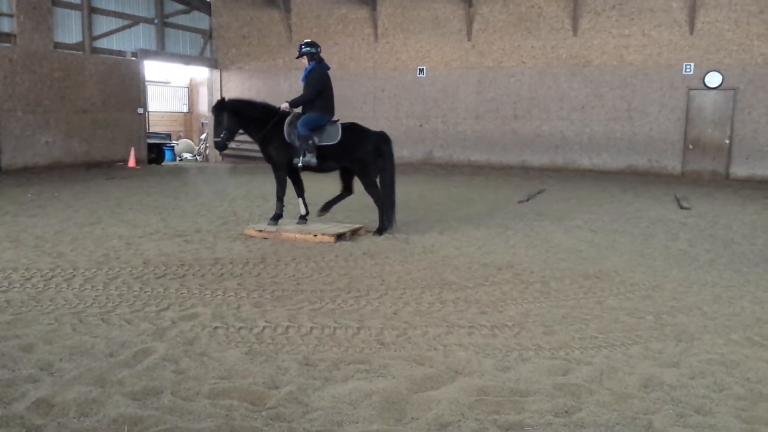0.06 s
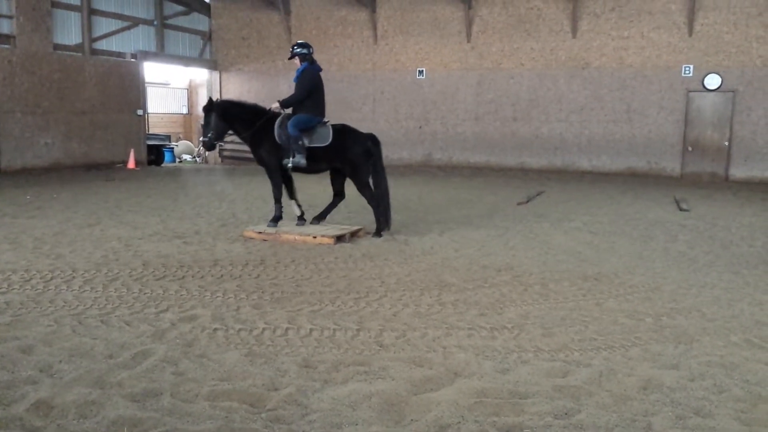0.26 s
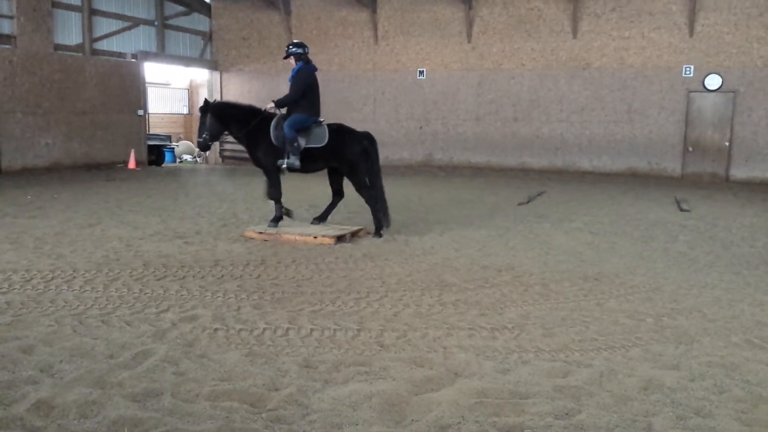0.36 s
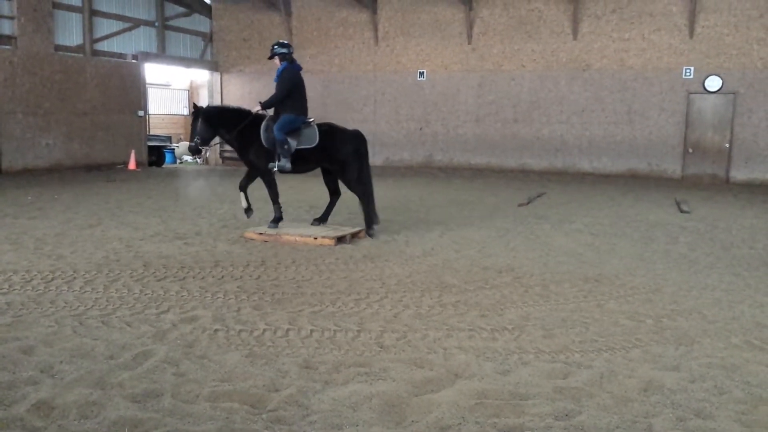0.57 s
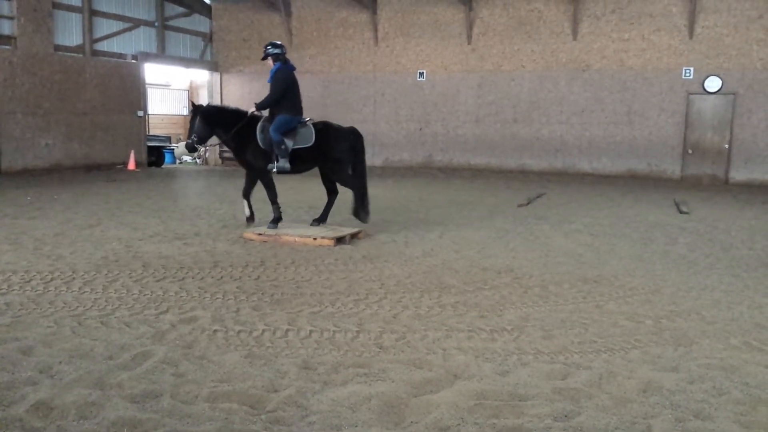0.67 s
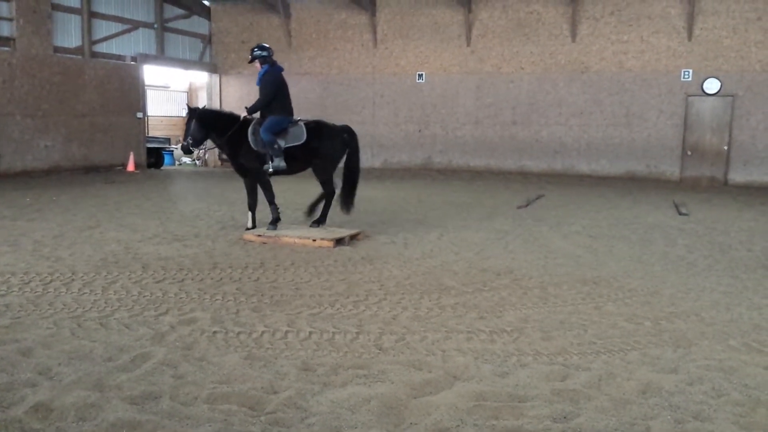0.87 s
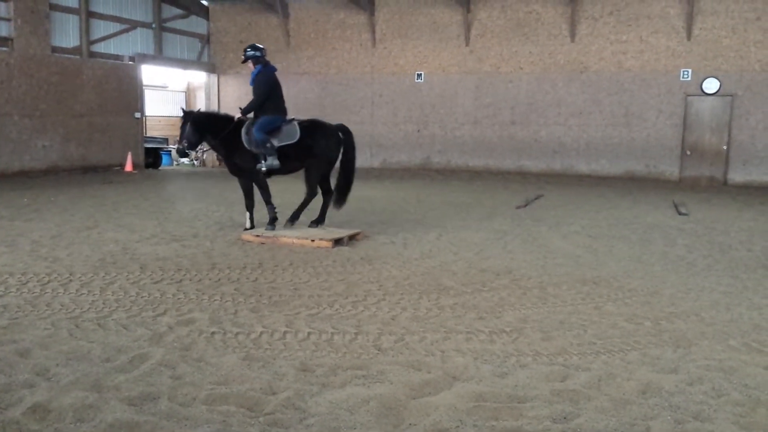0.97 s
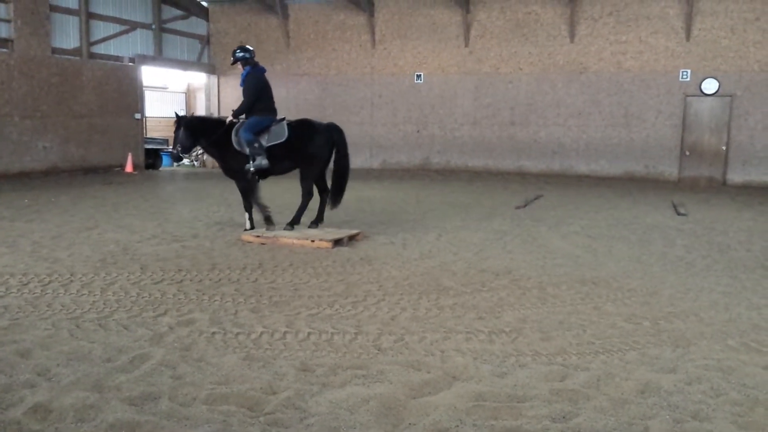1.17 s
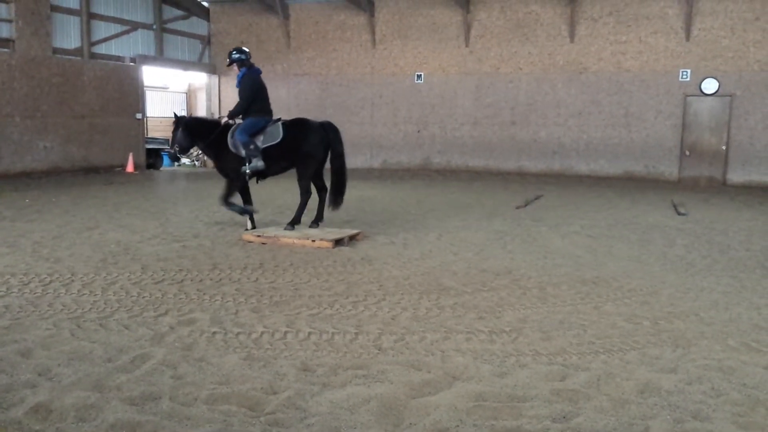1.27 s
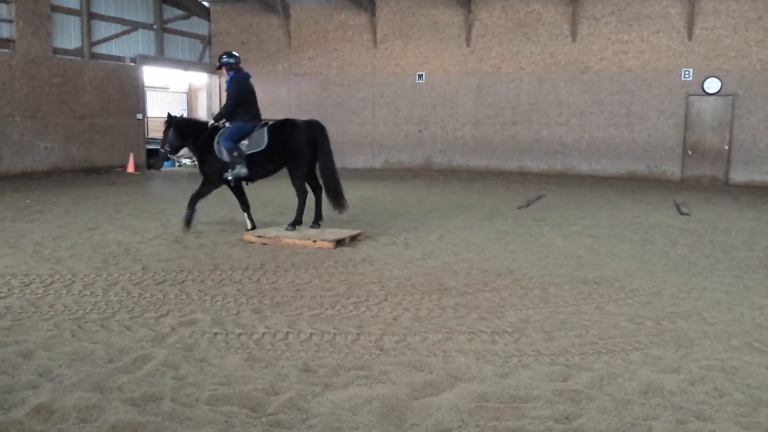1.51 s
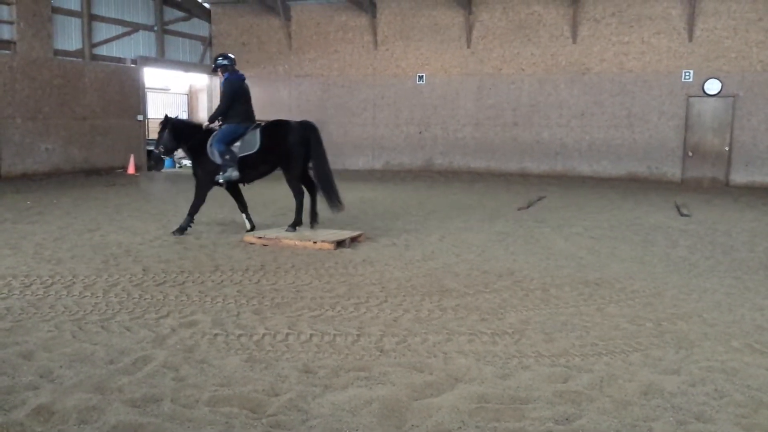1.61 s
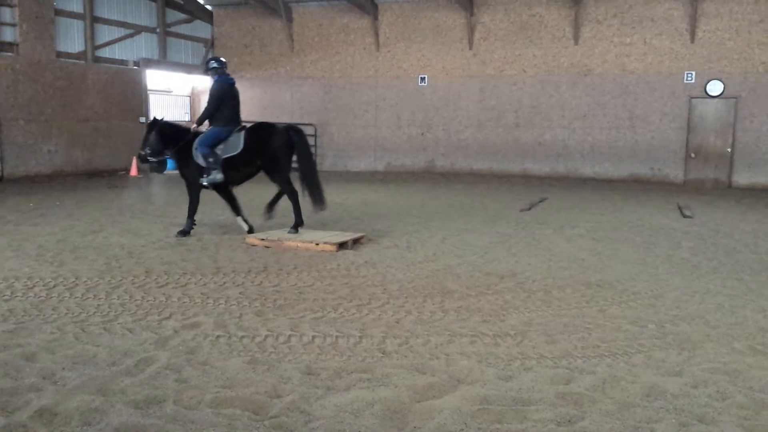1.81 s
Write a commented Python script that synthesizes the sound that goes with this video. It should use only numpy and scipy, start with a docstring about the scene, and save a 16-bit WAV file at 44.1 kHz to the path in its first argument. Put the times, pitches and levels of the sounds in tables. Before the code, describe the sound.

A horse's hooves knock and boom on hollow boards in an indoor riding arena.

```python
"""An indoor riding arena, where a horse walks over a low, hollow wooden platform.
Each hoof lands in a quick roll of impacts that excite the modes of the boards, and the deck booms
in its low modes as the hooves land and the weight shifts. Between the thuds the hooves scuff through
sand, and grit and tack tick. The big hall reverberates over a faint, steady rumble."""
import sys
import numpy as np
from scipy import signal
from scipy.fft import rfft, irfft, next_fast_len
from scipy.io import wavfile

SR = 44100
rng = np.random.default_rng(int(sys.argv[2]) if len(sys.argv) > 2 else 0)


def to_wav(s):
    """Save 16-bit WAV."""
    ch = np.atleast_2d(s).T  # columns
    pcm = np.round(np.clip(ch, -1, 1) * 32767)  # PCM
    wavfile.write(sys.argv[1], SR, pcm.astype(np.int16))


N = 81585
BURST_SAMPLES, TAIL_SAMPLES = SR // 4, SR * 5 // 4

# Modes of the deck: (frequency at pitch ratio 1 [Hz], level [dB], T60 [s], after-ring level [dB])
DECK_MODES = [(117.6, -24, 0.28, -17), (216, -14, 0.097, -10.5), (261.2, -8, 0.058, -9.5),
              (322.7, -7, 0.054, -20), (605, -21.5, 0.038, -17), (666.6, -12.5, 0.039, -69),
              (788.6, -2, 0.041, -13.5), (828.7, -4.5, 0.031, -1), (940, -15, 0.14, -5),
              (1070, -4, 0.054, -41), (1154, -5.5, 0.05, -20), (1543, -18.5, 0.072, -53),
              (1871, -53, 0.029, -25), (2686, -18, 0.033, -23)]


def hooves(attack_s=0.0011, hoof_t60_s=0.08, crack_t60_s=0.073, crack_db=0.5):
    """Impact excitation: each contact rings deck and hoof and cracks; a toe is bright, a sole dull."""
    # Hoof on board: (time [s], level [dB], pitch ratio of the loaded deck, low edge [Hz],
    # high edge [Hz], hoof resonance [Hz], hoof level [dB], send to the hall [dB])
    contacts = [(.2362, -10.5, 0.9, 543, 1380, 832, 1.5, -2.5), (0.2418, -10, 1, 188, 315, 263, -17, -0.5),
                (0.2481, -13, 1, 520, 1650, 1084, -8, -2),
                (0.2561, -8.5, 0.98, 171, 1260, 265.4, -12.5, -3.5),
                (.2745, -19.5, 0.99, 1000, 2970, 2308, -16, -2.5),
                (1.1351, -19.5, .83, 134, 1090, 643, -26, -1),
                (1.1465, -19.5, 0.72, 296, 1350, 1317, -5, -3),
                (1.158, -18.5, 0.95, 128, 417, 385.6, -8, 1),
                (1.322, -42, 0.76, 1450, 2720, 1752, -2.5, 3.5),
                (1.437, -36, .83, 278.6, 812.2, 461, -3, -4.5),
                (1.715, -32.5, 0.96, 278, 800, 640, -4.5, 1), (1.725, -32, 0.72, 555, 1374, 1035, 2, -11),
                (1.739, -31, 0.74, 910, 2110, 1134, -4.5, -7.5)]
    # Spectrum of the impact noise: (frequency at pitch ratio 1 [Hz], relative density [dB])
    crack_spectrum = [(50, -26), (110, 8.5), (190, 2.5), (260, 9), (340, -18.5), (430, -39), (620, -6),
                      (820, 9.5), (1150, -6.5), (1500, 0), (2500, -8.5), (3800, -14.5), (8000, 1.5),
                      (14000, -37)]
    knocks, reverberation = np.zeros((2, N)), np.zeros((2, N))
    t = np.arange(BURST_SAMPLES) / SR
    for s, db, pitch, low_hz, high_hz, hoof_hz, hoof_db, hall_db in contacts:
        boards = sum(damped_mode(t, hz * pitch, level, t60) for hz, level, t60, _ in DECK_MODES)
        hoof = damped_mode(t, hoof_hz, hoof_db, hoof_t60_s)
        noise = coloured(diffuse(BURST_SAMPLES), [(hz * pitch, level) for hz, level in crack_spectrum])
        crack = amp(crack_db) * decay(t, crack_t60_s) * noise
        impact = (boards + hoof + crack) * (1 - np.exp(-t / attack_s))
        knock = amp(db) * butterworth(butterworth(impact, low_hz, "high"), high_hz, "low", order=3)
        add(knocks, knock, s)
        add(reverberation, amp(hall_db) * hall(knock), s)
    return knocks + wall_reflections(knocks) + reverberation


def after_ring(rise_s=0.033):
    """Free vibration: the deck's modes hum on faintly after a full landing."""
    # Full landings: (time [s], level [dB], pitch ratio, high edge [Hz])
    landings = [(.243, -18.5, 0.97, 2610), (1.147, -22.5, .873, 480)]
    # Decay of the hum: (frequency at pitch ratio 1 [Hz], T60 [s])
    hum_t60 = [(120, 1.3), (260, 1.28), (800, 0.65), (1200, 1), (2600, 0.43)]
    out, t = np.zeros(N), np.arange(TAIL_SAMPLES) / SR
    for s, db, pitch, high_hz in landings:
        hum = sum(damped_mode(t, hz * pitch, level, along(hum_t60, hz)) for hz, _, _, level in DECK_MODES)
        add(out, amp(db) * (1 - np.exp(-t / rise_s)) * butterworth(hum, high_hz, "low"), s)
    return out


def deck_booms(rise_s=0.016, hall_db=-7):
    """Flexural vibration: the deck booms in its low modes as the hooves land and the weight shifts."""
    # Landing or shifting weight: (time [s], level [dB], frequency [Hz])
    loads = [(0.092, -49, 122), (0.2381, -16.5, 259.3), (.43, -38, 124), (0.774, -37.5, 134.7),
             (.85, -38.5, 126), (1.136, -29, 134.5), (1.234, -29.5, 226), (1.265, -29, 133),
             (1.521, -30, 136.3), (1.718, -45.5, 130)]
    out = np.zeros(N)
    for s, db, hz in loads:
        age = np.maximum(np.arange(N) / SR - s, 0)
        swell = (age / rise_s * np.exp(1 - age / rise_s)) ** 2
        out += amp(db) * swell * np.sin(2 * np.pi * hz * age)
    return out + amp(hall_db) * hall(out[None])


def sand_scuffs(grains_per_s=2400, spread_db=1):
    """Granular friction: dense, random impulses of tiny grains merge into a crunch under each scuff."""
    # Hoof through sand: (time [s], level [dB], rise [s], decay constant [s], upper treble gain [dB])
    scuffs = [(0.233, -39, 0.0075, 0.024, -1), (.272, -37, 0.0028, 0.01, -10), (.58, -56, .06, .06, -3),
              (0.698, -45, 0.01, 0.086, -3), (0.736, -48, .01, 0.039, -10), (0.874, -53, 0.022, 0.018, 2.5),
              (1.095, -51.5, 0.044, 0.026, -1), (1.132, -45.5, 0.024, 0.076, -6),
              (1.189, -66, 0.0053, .03, 5), (1.263, -53, 0.022, .05, 1), (1.3, -43.5, 0.008, .05, -6.5),
              (1.431, -51.5, 0.0081, 0.046, -15), (1.573, -52, 0.017, 0.24, -5),
              (1.667, -50, 0.013, 0.041, 3.5), (1.716, -49, 0.008, 0.065, -10.5)]
    # Spectrum of the grains: (frequency [Hz], relative density [dB])
    sand_spectrum = [(200, 2), (600, 3.5), (1200, 7.5), (2300, -1), (3200, -4.5), (4300, -3.5), (6200, 2.5),
                     (8500, -4.5), (11000, -8.5), (14500, -25)]
    out, t = np.zeros((2, N)), np.arange(2 * BURST_SAMPLES) / SR
    for s, db, rise_s, decay_s, treble_db in scuffs:
        grains = (rng.random((2, t.size)) < grains_per_s / SR) * rng.standard_normal((2, t.size))
        grains *= amp(spread_db * rng.standard_normal(t.size))
        crunch = equalised(coloured(grains, sand_spectrum), [(3500, 0.0043), (7000, treble_db)])
        envelope = np.minimum(t / rise_s, 1) * np.exp(-np.maximum(t - rise_s, 0) / decay_s)
        add(out, amp(db) * envelope * crunch, s)
    return out


def ticks(relative_width=0.14):
    """Narrow-band transients: grit and tack tick and rasp high in the treble."""
    # Noise bursts: (time [s], level [dB], centre frequency [Hz], decay constant [s])
    bursts = [(0.71, -54.5, 3090, 0.042), (.739, -56.5, 6510, 0.0074), (0.744, -53, 3080, 0.014),
              (0.888, -58, 5800, 0.017), (1.191, -57, 8600, .003), (1.203, -48, 6500, 0.0036),
              (1.266, -54, 9340, 0.0064), (1.675, -56, 10030, 0.011), (1.691, -55.5, 6000, 0.058)]
    out, t = np.zeros((2, N)), np.arange(BURST_SAMPLES) / SR
    for s, db, centre_hz, decay_s in bursts:
        noise = diffuse(BURST_SAMPLES)
        band = unit_rms(filtered(noise, lambda hz: np.exp(-((hz / centre_hz - 1) / relative_width) ** 2)))
        add(out, amp(db) * np.exp(-t / decay_s) * band, s)
    return out


def wall_reflections(x, top_hz=700):
    """Specular reflection: each near wall returns one delayed, dull copy."""
    # Near walls: (delay [s], gain [dB])
    walls = [(.073, -29), (.094, -14)]
    copies = filtered(x, lambda hz: sum(amp(db) * np.exp(-2j * np.pi * hz * s) for s, db in walls))
    return butterworth(copies, top_hz, "low")


def hall(x, build_s=0.022):
    """Reverberation: each frequency decays at its own rate, and the far end returns the bass late."""
    # Reverberation time: (frequency [Hz], T60 [s])
    hall_t60 = [(80, 1.24), (250, 1.204), (500, 0.98), (900, 0.99), (2000, 0.64), (4000, 0.99), (8000, 1.8),
                (14000, 0.44)]
    # Strength of the reverberant field: (frequency [Hz], gain [dB])
    hall_gain = [(60, -1), (130, 4.5), (250, 2.5), (450, 5.5), (800, 6), (1300, 4), (2500, 3.5), (6000, 7),
                 (14000, 7.5)]
    return_s, return_width_s, return_db, bass_hz = 0.37, 0.067, 5, 484
    drop_s, drop_db = 0.434, 1  # after the return the bass falls away
    hz, t, spectrogram = signal.stft(diffuse(TAIL_SAMPLES), SR, nperseg=512)
    t60 = along(hall_t60, hz)[:, None]
    fade = decay(t, t60) * np.sqrt(2 * np.log(1000) / (t60 * SR))  # equal energy for any T60
    late_db = return_db * np.exp(-((t - return_s) / return_width_s) ** 2) - drop_db * (t > drop_s)
    gain_db = along(hall_gain, hz)[:, None] + late_db / (1 + (hz[:, None] / bass_hz) ** 2)
    tail = signal.istft(spectrogram * fade * amp(gain_db), SR, nperseg=512)[1]
    swell = 1 - np.exp(-np.arange(tail.shape[1]) / SR / build_s)
    return signal.fftconvolve(x, tail * swell, axes=1)[:, :N]


def room_tone(level_db=-53.5):
    """Stationary background noise: the hall's low rumble and faint hiss."""
    # Spectrum of the background: (frequency [Hz], relative density [dB])
    air_spectrum = [(20, -43), (54, -13.5), (87, -17), (129, -9), (173, -14.5), (335, -15), (440, -27.5),
                    (850, -27.5), (1250, -36.5), (2570, -36.5), (4140, -40.5), (6300, -37), (9500, -40.5),
                    (14000, -43.5)]
    return amp(level_db) * coloured(diffuse(next_fast_len(N))[:, :N], air_spectrum)


def diffuse(size):
    """Diffuse field: stereo white noise from all round, coherent in the bass, unrelated in the treble."""
    # Likeness of left and right: (frequency [Hz], correlation)
    coherence = [(60, .98), (280, 0.97), (620, 0.74), (1350, 0.023), (3000, .01)]
    angle = np.arccos(np.clip(along(coherence, np.fft.rfftfreq(size, 1 / SR)), -1, 1)) / 2
    spectra = rfft(rng.standard_normal((2, size)))
    mid, side = irfft(spectra * np.array([np.cos(angle), np.sin(angle)]), size)
    return np.array([mid + side, mid - side])


def damped_mode(t, hz, db, t60):
    """Damped harmonic oscillator: an exponentially decaying sine."""
    return amp(db) * decay(t, t60) * np.sin(2 * np.pi * hz * t)


def decay(t, t60):
    """Exponential decay of 60 dB in t60 seconds."""
    return np.exp(-np.log(1000) * t / t60)


def amp(db):
    """Decibels to amplitude ratio."""
    return 10 ** (np.asarray(db) / 20)


def unit_rms(x):
    """Normalisation to rms 1."""
    return x / np.sqrt(np.mean(x ** 2) + 1e-20)


def along(points, hz):
    """Interpolation of (frequency [Hz], value) points on a logarithmic frequency axis."""
    frequencies, values = np.transpose(points)
    return np.interp(np.log(hz + 1), np.log(frequencies + 1), values)


def filtered(x, response):
    """Linear filtering: the spectrum of x times a frequency response."""
    size = next_fast_len(x.shape[-1] + 8192)
    return irfft(rfft(x, size) * response(np.fft.rfftfreq(size, 1 / SR)), size)[..., :x.shape[-1]]


def equalised(x, curve):
    """Zero-phase filtering by a (frequency [Hz], gain [dB]) curve."""
    return filtered(x, lambda hz: amp(along(curve, hz)))


def coloured(x, spectrum):
    """Spectral shaping, normalised to rms 1."""
    return unit_rms(equalised(x, spectrum))


def butterworth(x, hz, kind, order=2):
    """Causal high-pass or low-pass filtering."""
    return signal.sosfilt(signal.butter(order, min(hz, SR / 2 - 1), kind, fs=SR, output="sos"), x)


def add(out, x, s):
    """Superposition of x on out, starting at s seconds."""
    start = max(round(s * SR), 0)
    out[..., start:start + x.shape[-1]] += x[..., :N - start]


def scene(grit_hall_db=-8.5):
    """Superposition: wood, sand and hall sum at two microphones that differ in the treble."""
    # Response of each microphone: (frequency [Hz], gain [dB])
    left_response = [(100, -4), (300, 2.8), (1000, -7.1), (2500, 1.1), (4300, -0.5), (6300, 4.5), (8500, 3),
                     (12000, -3.5)]
    right_response = [(100, -3.5), (300, 1.8), (1000, -6.93), (2500, 1.5), (4300, 1), (6300, -8),
                      (8500, -0.5), (12000, -12)]
    grit = sand_scuffs() + ticks()
    left, right = hooves() + after_ring() + deck_booms() + grit + amp(grit_hall_db) * hall(grit)
    return room_tone() + np.array([equalised(left, left_response), equalised(right, right_response)])


def record(dry, top_hz=14540):
    """Band limiting: an ideal low-pass removes the highest treble."""
    return filtered(dry, lambda hz: hz < top_hz)


dry = scene()
out = record(dry)
to_wav(out)
```